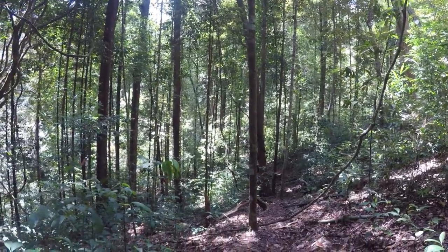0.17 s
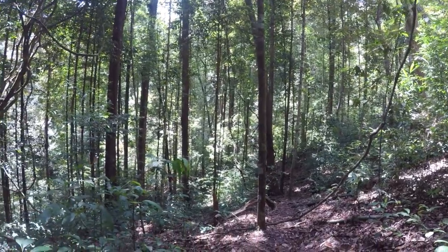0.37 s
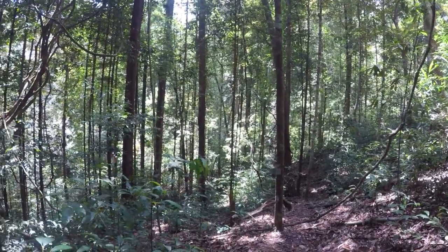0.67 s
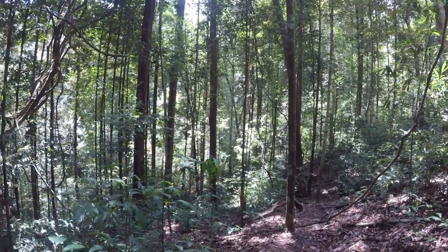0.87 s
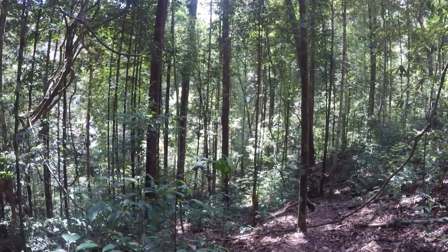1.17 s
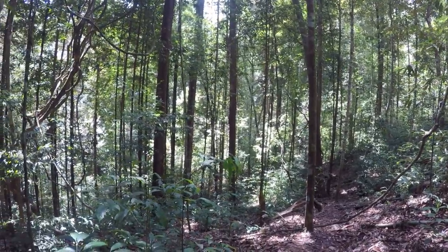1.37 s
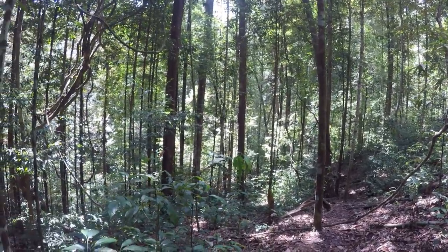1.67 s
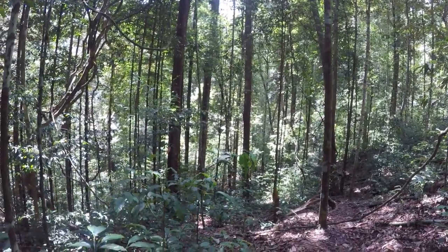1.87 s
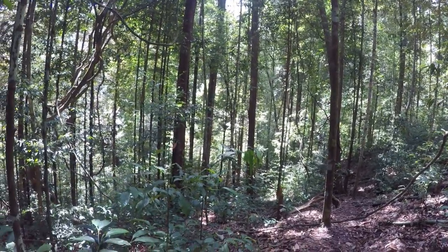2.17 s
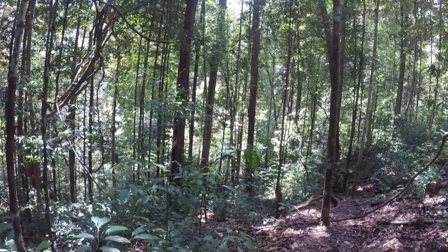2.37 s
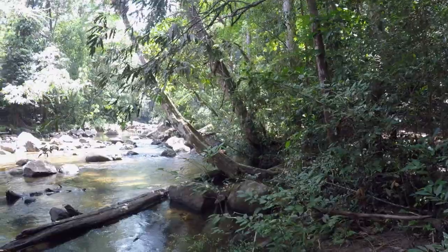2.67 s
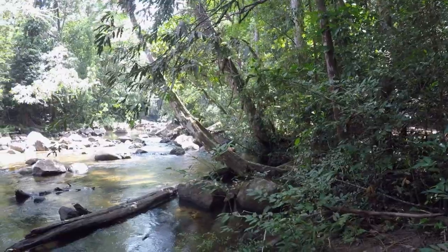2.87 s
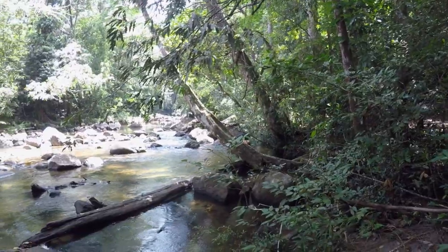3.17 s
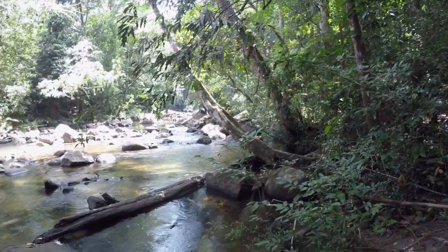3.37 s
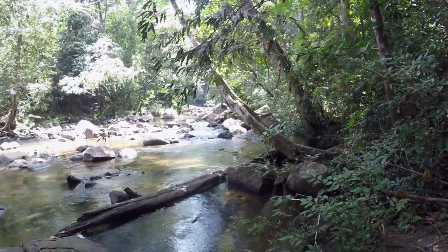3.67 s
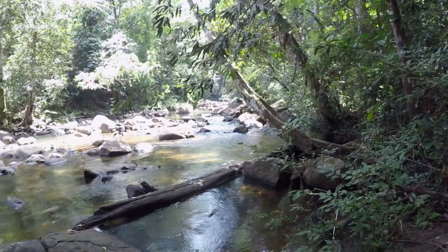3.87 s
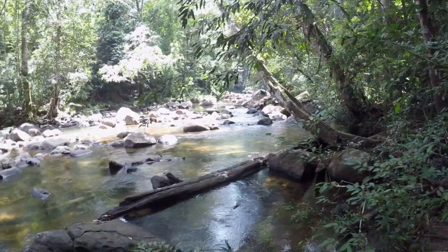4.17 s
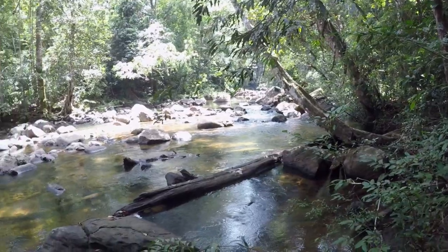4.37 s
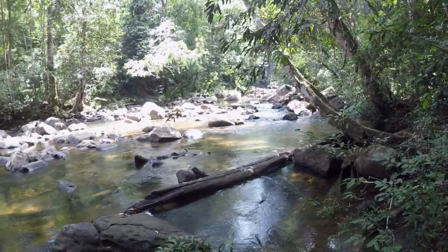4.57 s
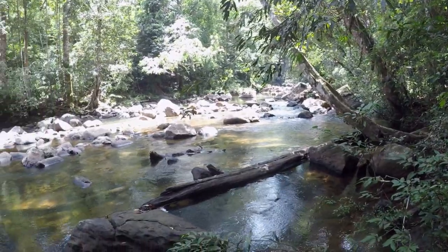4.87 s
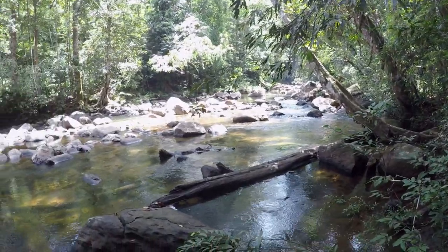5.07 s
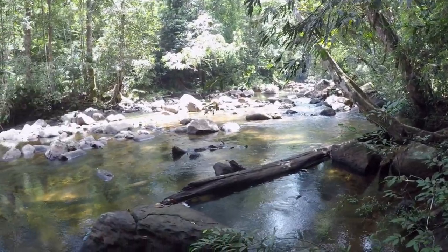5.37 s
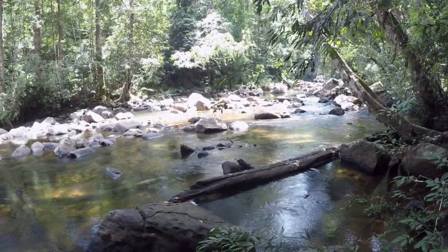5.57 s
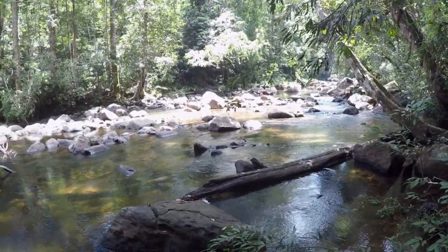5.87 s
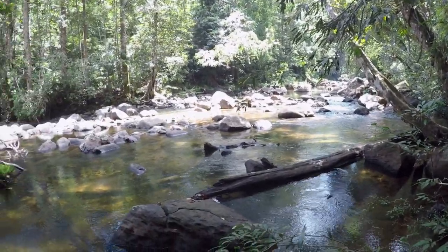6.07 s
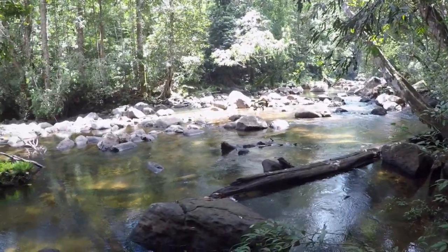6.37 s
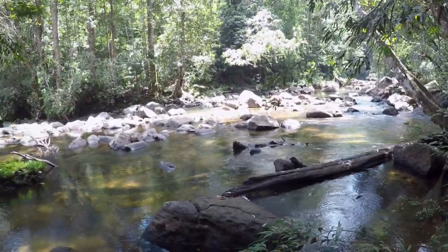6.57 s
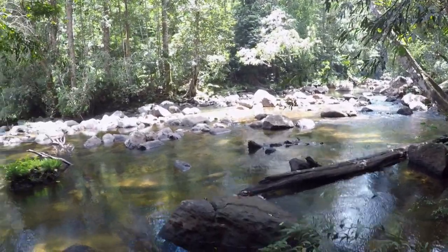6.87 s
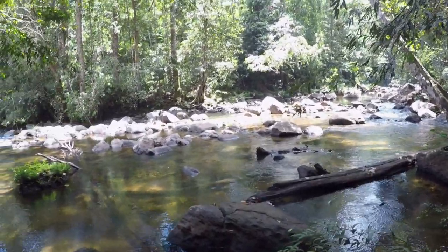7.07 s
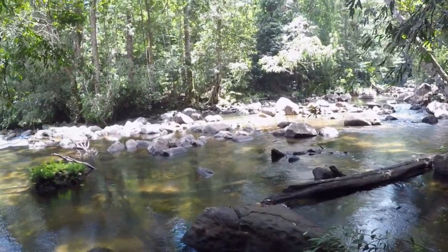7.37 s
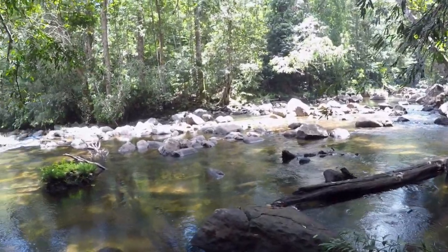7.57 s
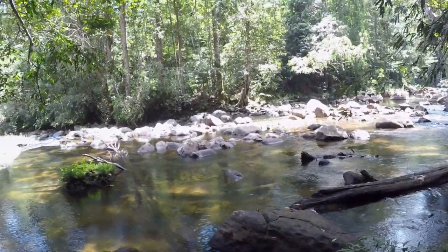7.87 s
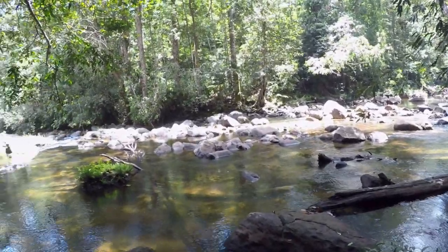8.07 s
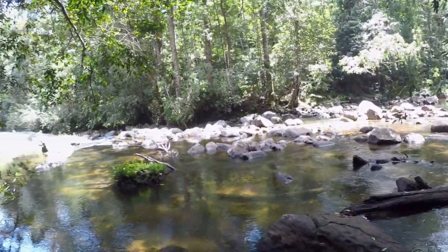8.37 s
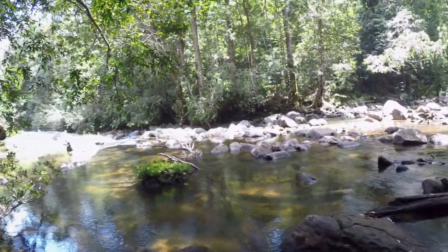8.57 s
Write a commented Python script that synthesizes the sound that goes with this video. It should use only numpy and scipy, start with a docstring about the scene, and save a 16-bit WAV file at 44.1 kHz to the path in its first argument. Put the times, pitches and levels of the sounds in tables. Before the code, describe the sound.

Quiet woodland opens with soft distant water and thin, wavering insect whines. Rubbing, dull thumps, taps and a rubbery squeak come from a hand right on the stereo microphone. Then the place switches suddenly to the stream bank, where water churns and hisses continuously. The sound grows fuller and broader from five seconds, with occasional big bubbles and one sharp, echoing twig crack on the right.

```python
"""A rainforest: a stream far off among the trees under droning insects, then the stream from its bank.
Among the trees a hand rubs and bumps the microphone's casing and a fingertip squeaks across a port.
At the bank the cascade roars, washes and fizzes, bubbles ring, and the image opens from near mono to wide.
A twig snaps on the right. Water is shaped noise and ringing bubbles; insects are fluttering sines;
the hand is noise and slip pulses ringing the casing; the twig is decaying noise bursts."""
import sys
import numpy as np
from scipy.fft import rfft, irfft, next_fast_len
from scipy.io import wavfile
from scipy.ndimage import map_coordinates

SR = 44100
rng = np.random.default_rng(int(sys.argv[2]) if len(sys.argv) > 2 else 0)


def wav_out(sig):
    """Save sig, one row per channel (or a flat mono array), as 16-bit PCM at SR to the path in sys.argv[1]."""
    wavfile.write(sys.argv[1], SR, np.round(np.clip(np.atleast_2d(sig).T, -1, 1) * 32767).astype(np.int16))


N = 384111
T = np.arange(N) / SR
CUT_S = 2.564  # the place changes from trees to bank


def amp(db):
    """Decibels to gain."""
    return 10 ** (np.asarray(db) / 20)


def unit(x):
    """Scale to rms 1."""
    return x / np.sqrt(np.mean(x ** 2) + 1e-20)


def along(points, hz, axis=1):
    """One column of a table, read on a log-frequency axis."""
    cols = np.transpose(points)
    return np.interp(np.log(hz + 1), np.log(cols[0] + 1), cols[axis])


def wobble(rate_hz):
    """A smooth random curve, rate_hz knots a second."""
    knots = rng.standard_normal(int(N * rate_hz / SR) + 4)
    coarse_s = T[::32]
    return np.interp(T, coarse_s, map_coordinates(knots, [coarse_s * rate_hz]))


def filtered(x, response):
    """x times a complex response of frequency."""
    m = next_fast_len(N + SR // 4, True)
    return irfft(rfft(x, m) * response(np.fft.rfftfreq(m, 1 / SR)), m)[..., :N]


def coloured(x, spectrum):
    """x given a spectrum, at rms 1."""
    return unit(filtered(x, lambda hz: amp(along(spectrum, hz))))


def hiss():
    """Two unrelated white noises."""
    return rng.standard_normal((2, N))


def spread(pair, side_db):
    """Mid and side to left and right."""
    mid, side = pair[0], amp(side_db) * pair[1]
    return np.array([mid + side, mid - side])


def fall(start_s, t60_s):
    """An envelope that starts at once and dies away exponentially."""
    return (T >= start_s) * amp(-60 * np.clip((T - start_s) / t60_s, 0, 10))


def swell(start_s, rise_s, hold_s, t60_s):
    """An envelope that rises linearly, holds and dies away exponentially."""
    up = np.clip((T - start_s) / rise_s, 0, 1)
    return up * amp(-60 * np.clip((T - start_s - rise_s - hold_s) / t60_s, 0, 10))


def ringing(modes, t, stretch):
    """Damped modes whose decay times are multiplied by stretch."""
    return sum(amp(db - 60 * t / (t60_s * stretch)) * np.sin(2 * np.pi * hz * t)
               for hz, db, t60_s in modes)


def bubbles(rate_hz, lo_hz, hi_hz, cycles, scatter_db, size):
    """Random bubbles at each port, each a sine rising in pitch as it dies, cut off at size samples."""
    u = np.arange(size) / SR
    ports = []
    for _ in range(2):
        when, pitch, strength = rng.random((int(rate_hz * N / SR), 3)).T[:, :, None]
        turns = lo_hz * (hi_hz / lo_hz) ** pitch * u
        age = turns / cycles
        life = (1 - np.exp(-turns)) * np.exp(-3 * age)
        level = amp(-scatter_db * np.log(np.maximum(strength, .01)))
        ring = level * life * np.sin(2 * np.pi * turns * (1 + 0.09 * np.minimum(age, 1)))
        at = (when * N).astype(int) + np.arange(size)
        ports.append(np.bincount(at.ravel(), ring.ravel(), N)[:N])
    return unit(np.array(ports))


# stereo microphone's image: [hz, likeness_0_to_1, right_lead_rad, left_over_right_db]
PORT_IMAGE = [(97, 0.98, -0.87, 0), (294, 0.95, 0.45, -3.5), (380, 0.67, 0.67, -8.5), (453, 0.89, 2, -4.5),
              (573, 0.81, 3, 0.5), (934, 0.76, 3, -2), (1390, 0.82, 2, -5.5), (1650, 0.34, 1.5, -5.5),
              (2280, 0.8, 1.66, -2.5), (3020, 0.37, 2, -0.5), (3840, 0.3, -1.5, -2), (5770, 0, 7, -6.5),
              (7520, 0.8, -8.5, -1.5), (11000, 0, -7, -1)]


def stereo(pair, spectrum):
    """Correlate two noises per frequency as the ports would; their middle has this spectrum at rms 1."""
    m = next_fast_len(N + SR // 4, True)
    hz = np.fft.rfftfreq(m, 1 / SR)
    a, b = rfft(pair, m)
    alike = np.clip(along(PORT_IMAGE, hz, axis=1), 0, 1)
    shared = alike * np.exp(1j * along(PORT_IMAGE, hz, axis=2))
    lean = amp(along(PORT_IMAGE, hz, axis=3))
    middle = np.sqrt(lean ** 2 + 1 + 2 * lean * shared.real + 1e-3)
    ports = np.array([lean * a, shared * a + np.sqrt(1 - alike ** 2) * b])
    out = irfft(ports * amp(along(spectrum, hz)) / middle, m)[:, :N]
    return out / np.std(out.mean(0))


def turning(pair, table, turn):
    """A stereo sound whose colour passes from the table's first spectrum to its second."""
    before, after = np.array(table)[:, :2], np.array(table)[:, ::2]
    return (1 - turn) * stereo(pair, before) + turn * stereo(pair, after)


# touch at one port: side against middle: [hz, side_over_mid_db]
PORT_SIDE = [(250, 3), (420, -9), (600, 11), (850, 8), (1200, 11), (1700, 8.5), (2400, 4.5), (5000, -5)]


def at_port(x):
    """A sound made right at the microphone, its side a quarter cycle out of step with its middle."""
    return spread([x, filtered(x, lambda hz: 1j * amp(along(PORT_SIDE, hz)))], side_db=0)


# far stream's low roar: [hz, relative_db_per_hz]
FAR_ROAR_SPECTRUM = [(15, -70), (45, -43), (70, -32), (100, -40), (122, -18), (150, 2), (190, -2),
                     (250, -9.5), (330, -16), (450, -27.5), (600, -46), (900, -74)]
# far stream's wash: [hz, relative_db_per_hz]
FAR_WASH_SPECTRUM = [(290, -6), (500, -2), (625, -1.5), (1020, -1.5), (1120, -1.5), (1990, 1.5),
                     (2700, -10.5), (3380, -10.5), (3670, -10), (4220, -14.5), (4790, -15.5), (6320, -12.5),
                     (8130, -14.5), (14000, -23)]
FAR_ROAR_DB, FAR_WASH_DB = -39.5, -52.5


def forest():
    """The stream far off through the trunks: two bands of shaped noise with slightly wavering levels."""
    roar_db = FAR_ROAR_DB + 1.2 * wobble(5.55) + 0.71 * wobble(9.2)
    wash_db = FAR_WASH_DB + 0.3 * wobble(6.7)
    roar = amp(roar_db) * stereo(hiss(), FAR_ROAR_SPECTRUM)
    wash = amp(wash_db) * stereo(hiss(), FAR_WASH_SPECTRUM)
    return roar + wash


# insect drones: [start_s, hold_s, settled_pitch_hz, flutter_hz, level_db]
INSECT_DRONES = [(-.1, 0.47, 3518, 7.7, -64), (.65, 0.56, 3527, 6.4, -61.5), (1.36, .13, 3527, 7, -61.5),
                 (-.1, .75, 3632, 8, -66), (0, .45, 3975, 12, -73), (-.1, .65, 3740, 10, -74),
                 (1.15, .49, 3745, 14, -68.5), (-.1, .24, 3848, 20, -70), (-.1, 1.75, 3700, 200, -71),
                 (-.1, 2.4, 14300, 200, -86)]
INSECT_RISE_S, INSECT_T60_S = .06, .7
SHARP_SHARE, SETTLE_S = .02, 1.7  # shared pitch excess at time 0, and when it has gone


def insects():
    """Each drone is a sine with fast random pitch flutter; one shared sharpness settles from the start."""
    sag = 1 + SHARP_SHARE * np.clip(1 - T / SETTLE_S, 0, 1)
    out = np.zeros((2, N))
    for start_s, hold_s, hz, flutter_hz, db in INSECT_DRONES:
        pitch_hz = hz * sag + flutter_hz * np.array([wobble(500), wobble(500)])
        effort = swell(start_s, INSECT_RISE_S, hold_s, INSECT_T60_S) * amp(db + 1.4 * wobble(59.3))
        out += effort * np.sin(2 * np.pi * np.cumsum(pitch_hz, axis=1) / SR)
    return spread(out, side_db=-3.0)


# soft bumps of the hand: [start_s, relative_level_db, t60_ratio]
HAND_BUMPS = [(1.68, -18, 0.9), (1.805, -23.5, 0.9), (2.196, 5, 0.6), (2.221, -15, 1.36),
              (2.276, -19.5, 2.2), (2.329, -5, 0.8), (2.375, -16, 0.85), (2.405, -11, 0.71),
              (2.419, -9, 0.73)]
# casing's modes: [pitch_hz, relative_level_db, t60_s before t60_ratio]
CASING_MODES = [(188.3, 2, 0.058), (232.4, -3, 0.043), (407, -13, 0.046)]
# grip tightens: [start_s, rise_s, hold_s, t60_s, level_db]
GRIP_BOOMS = [(2.167, 0.03, .025, 0.19, -21.5), (2.263, 0.022, .02, 0.16, -26),
              (2.37, .043, .02, 0.21, -27.5)]
# seam clicks under the hardest bump: [hz, relative_db_per_hz]
SEAM_SPECTRUM = [(500, -7), (1400, -8), (2100, 7), (2700, -9), (3400, -16), (4200, -13), (5000, -24),
                 (9000, -29), (14000, -44)]
# fingertip taps: [start_s, relative_knock_db, tick_db, t60_s]
FINGER_TAPS = [(2.394, -24, -25.5, 0.0041), (2.415, -45, -41, .0043), (2.434, -9, -25.5, 0.0067),
               (2.438, -23, -55, 0.015), (2.471, -18, -52, 0.029), (2.562, -24, -31, 0.0042)]
# tap's knock: [hz, relative_db_per_hz]
KNOCK_SPECTRUM = [(150, -14), (500, 17.5), (1100, 15), (1700, 13), (2300, 11), (2850, -26), (4200, -26),
                  (7000, -48)]
# tap's tick: [hz, relative_db_per_hz]
TICK_SPECTRUM = [(1500, -7), (2900, -6), (3400, 8), (4700, 0), (5800, 6), (9000, -3), (12000, -7),
                 (15000, -20)]
# hollow behind the ports: [pitch_hz, relative_level_db, t60_s before stretch]
HOLLOW_MODES = [(328, -11.5, 0.045), (1060, -10, 0.027), (1410, -19, 0.018), (2180, -15, 0.018)]
PAD_S = .0012  # the soft fingertip builds its knock over this time
LOW_CUT_HZ = 120.0


def knocks():
    """Grip and bumps boom in the casing, its seam clicks; taps knock, tick and ring the hollow."""
    grip = sum(amp(db) * swell(start_s, rise_s, hold_s, t60_s)
               for start_s, rise_s, hold_s, t60_s, db in GRIP_BOOMS)
    boom, hollow = grip * coloured(hiss()[0], ROAR_SPECTRUM), np.zeros(N)
    t = np.arange(SR // 5) / SR
    soft = 1 - np.exp(-(t / 0.0059) ** 2)
    for start_s, db, stretch in HAND_BUMPS:
        boom[round(start_s * SR):][:len(t)] -= amp(db + 3.5) * soft * ringing(CASING_MODES, t, stretch)
    boom = filtered(boom, lambda hz: hz ** 8 / (hz ** 8 + LOW_CUT_HZ ** 8))
    for start_s, db, _, _ in FINGER_TAPS:
        hollow[round(start_s * SR):][:len(t)] += amp(db) * ringing(HOLLOW_MODES, t, stretch=0.8)
    knock_level = sum(amp(db) * swell(start_s - PAD_S, PAD_S, 0, t60_s)
                      for start_s, db, _, t60_s in FINGER_TAPS)
    knock = knock_level * stereo(hiss(), KNOCK_SPECTRUM)
    tick_level = sum(amp(db) * fall(start_s, t60_s) for start_s, _, db, t60_s in FINGER_TAPS)
    tick = tick_level * coloured(hiss(), TICK_SPECTRUM)
    seam = amp(-18) * fall(2.1975, .034) * spread(coloured(hiss(), SEAM_SPECTRUM), side_db=-3)
    return boom + seam + at_port(hollow) + amp(-6.5) * knock + spread(tick, side_db=-4.0)


# hand strokes: [start_s, rise_s, hold_s, t60_s, level_db, firmness_0_to_1, panel_pitch_ratio]
HAND_STROKES = [(1.694, .002, 0.019, 0.16, -35.5, 0.89, 1), (1.701, .014, 0.054, 0.2, -32, 1, 1.03),
                (1.809, .05, .008, 0.074, -29.5, 0.94, 0.99), (1.886, 0.023, 0.049, 0.098, -41, 0.68, .99),
                (1.993, 0.032, 0.14, .26, -43, 0.02, 1), (2.126, .072, 0.044, .7, -39, 0.02, 1)]
# panels rung by rubbing: [pitch_hz, width_hz, relative_level_db]
PANEL_MODES = [(880, 100, 3.5), (1470, 130, 9), (2380, 140, 6), (2700, 120, 4.5), (3320, 110, 6),
               (4250, 80, 7), (4700, 230, 13)]
# firm rubbing: [hz, relative_db_per_hz]
RUB_SPECTRUM = [(350, -15), (580, -8), (780, -1.5), (1200, -1), (2200, 2), (3000, -4), (4000, -10),
                (5500, -13.5), (10000, -15.5), (14000, -41)]
# light brushing: [hz, relative_db_per_hz]
BRUSH_SPECTRUM = [(290, -8), (500, -2), (680, -7), (1000, -0.5), (1750, -3), (2080, -4), (2450, -3.5),
                  (3300, -17), (3950, -8.5), (4550, -21), (5300, -15), (5850, -10.5), (6450, -20),
                  (9000, -24), (14000, -46)]
CATCH_HZ, CATCH_FADE_DB = 480, 7  # nominal catch rate; fade from one catch to the next


def panels(hz):
    """Sum of the panels' resonances as a complex response."""
    return sum(amp(db) * 1j * hz * width_hz / (mode_hz * mode_hz - hz * hz + 1j * hz * width_hz)
               for mode_hz, width_hz, db in PANEL_MODES)


def slides():
    """Skin drags in tiny uneven catches; firm strokes ring panels at a wandering pitch, light ones brush."""
    firm, light, bend = np.zeros((3, N))  # powers
    for start_s, rise_s, hold_s, t60_s, db, firmness, ratio in HAND_STROKES:
        power = (amp(db) * swell(start_s, rise_s, hold_s, t60_s)) ** 2
        share = np.clip(firmness, 0, 1)
        firm += share * power
        light += (1 - share) * power
        bend += share * power * (ratio - 1)
    pitch_ratio = 1 + bend / (firm + 1e-12) + 0.0118 * wobble(30)
    since_slip = np.cumsum(CATCH_HZ * amp(2.2 * wobble(300))) / SR % 1
    catches = hiss() * amp(2.2 * hiss() - CATCH_FADE_DB * since_slip)
    # reading the ringing faster or slower bends its pitch
    read_at = np.cumsum(pitch_ratio)
    ring = np.array([np.interp(read_at, np.arange(N), port) for port in filtered(catches, panels)])
    rub_level = np.sqrt(firm) * amp(0.53 * wobble(150))
    rub = rub_level * stereo(catches + amp(1.5) * ring, RUB_SPECTRUM)
    brush_level = np.sqrt(light) * amp(0.89 * wobble(160) + 0.65 * wobble(35.2))
    brush = brush_level * stereo(hiss() * amp(2.1 * hiss()), BRUSH_SPECTRUM)
    return rub + brush


# air pushed by the hand or stirring at the ports: [start_s, rise_s, hold_s, t60_s, level_db]
AIR_PUFFS = [(2.317, 0.011, 0.036, 0.58, -30.5), (2.462, 0.025, 0.014, 0.11, -24),
             (2.529, 0.0096, 0.018, .015, -20.5), (2.58, 0.036, 0.66, 5.6, -57.5), (6.074, .3, .12, 2, -54),
             (6.9, 0.46, 0.62, 5, -63)]
# air at the ports: [hz, relative_db_per_hz]
RUMBLE_SPECTRUM = [(12, -45), (26, -5), (42, -15), (65, -1.5), (85, -23), (130, -12), (300, -29),
                   (700, -28), (3000, -110)]


def draught():
    """Each puff of air rumbles in the ports: low noise under a swell."""
    flow = sum(amp(db) * swell(start_s, rise_s, hold_s, t60_s)
               for start_s, rise_s, hold_s, t60_s, db in AIR_PUFFS)
    return flow * spread(coloured(hiss(), RUMBLE_SPECTRUM), side_db=-27)


# fingertip's drag: [time_s, nominal_slip_rate_hz, level_db]
FINGER_DRAG = [(2.438, 520.3, -60), (2.447, 520, -41), (2.459, 546, -33.5), (2.469, 520, -46),
               (2.478, 540, -30), (2.487, 589.4, -32), (2.501, 570.4, -45), (2.515, 620, -33),
               (2.523, 660, -31), (2.53, 540, -29), (2.535, 480, -18), (2.545, 419, -23.5),
               (2.562, 346, -22.5)]
# fingertip's squeak: [hz, relative_db_per_hz]
SQUEAK_SPECTRUM = [(200, 3.5), (400, 10), (600, 6), (760, -1.5), (1050, 0.5), (1250, -0.5), (1700, -6.5),
                   (2300, -9.5), (2800, -26), (3350, -19.5), (4200, -32), (8000, -43)]
SLIP_NOISE, SLIP_JITTER = .5, .035  # noise against slips at rms 1; unsteadiness of the rate (share)
SMEAR_S_PER_HZ = 6e-7  # soft skin delays each slip's higher frequencies


def finger():
    """A fingertip sticks and slips across a port: a squeak that breaks off twice, then falls when pressed."""
    time_s, slip_hz, db = np.transpose(FINGER_DRAG)
    rate_hz = np.interp(T, time_s, slip_hz) * (1 + SLIP_JITTER * wobble(200))
    slips = unit(np.diff(np.floor(np.cumsum(rate_hz) / SR), prepend=0))
    slips = filtered(slips - slips.mean(), lambda hz: np.exp(-1j * np.pi * SMEAR_S_PER_HZ * hz ** 2))
    rough = amp(1.6 * wobble(400)) * (slips + SLIP_NOISE * rng.standard_normal(N))
    level = (T > time_s[0]) * amp(np.interp(T, time_s, db))
    return at_port(level * coloured(rough, SQUEAK_SPECTRUM))


# cascade's deep boom, also the grip's: [hz, relative_db_per_hz]
ROAR_SPECTRUM = [(20, -53), (60, -39), (98, -28.5), (120, -24), (140, -1.5), (165, 3), (200, -2.5),
                 (240, -9), (320, -40), (400, -24), (600, -61), (1500, -120)]
# churn above the boom: [hz, relative_db_per_hz]
CHURN_SPECTRUM = [(60, -80), (150, -35), (200, -3), (240, 0.5), (295, -4), (345, -8), (420, -16.5),
                  (520, -24.5), (800, -84), (2000, -120)]
# rapids' wash: [hz, before_turn_relative_db_per_hz, after_turn_relative_db_per_hz]
WASH_SPECTRA = [(300, -26, -24), (484, -8.5, -8.5), (660, -3.5, -5.5), (1020, -8.5, -7), (1120, -7, -6),
                (1370, -4, -4.5), (1600, -1.7, -2), (1870, 0, 0), (2270, -4.5, -2), (2610, -7, -5.5),
                (2870, -7, -11), (3200, -10, -10.5), (3690, -10.5, -11), (4470, -21, -22), (6500, -59, -59)]
# rapids' fizz: [hz, before_turn_relative_db_per_hz, after_turn_relative_db_per_hz]
FIZZ_SPECTRA = [(3000, -30, -30), (4400, -9, -3), (4810, 1.5, -1), (5050, -2.5, -2.5), (5370, 2.5, 0),
                (6100, -2.5, 0.5), (6880, -0.5, -3), (8000, -9, -8.5), (10000, -16, -12.5),
                (14000, -47, -47)]
# fine spray: [hz, relative_db_per_hz]
SPRAY_SPECTRUM = [(5000, -18), (7500, 0), (8800, 2), (10200, 0), (11500, -8), (13500, -12.5), (15200, -33)]
TURN_AT_S, TURN_S = 5.02, 2.01  # turn along the bank toward the open water
# level before the turn, gain over the turn
ROAR_DB, ROAR_GAIN_DB = -37, 10
CHURN_DB, CHURN_GAIN_DB = -36, 5.5
WASH_DB, WASH_GAIN_DB = -41, 1.5
FIZZ_DB, FIZZ_GAIN_DB = -56, 5.5
SPRAY_DB, SPRAY_GAIN_DB = -59, -1.6
DEEPEN_S, DEEPEN_ROAR_DB, DEEPEN_CHURN_DB = 0.44, 3.5, -4.5  # a quick extra shift in the low end from 5.02 s: its time, boom gain, churn gain
FIZZ_DULL_DB, SPRAY_DULL_DB, OPEN_S = 10, 25, 0.2  # first treble loss at the bank; its time constant


def cascade():
    """Plunging water booms and churns; rapids wash, babble, fizz and spray; from 5.02 s the boom quickly swells
    and the churn dips."""
    turn = np.clip((T - TURN_AT_S) / TURN_S, 0, 1)
    deep = np.clip((T - TURN_AT_S) / DEEPEN_S, 0, 1)
    dull = np.exp(-np.maximum(T - CUT_S, 0) / OPEN_S)
    roar_db = ROAR_DB + ROAR_GAIN_DB * turn + DEEPEN_ROAR_DB * deep + 0.59 * wobble(12)
    churn_db = CHURN_DB + CHURN_GAIN_DB * turn + DEEPEN_CHURN_DB * deep + 1.3 * wobble(13)
    wash_db = WASH_DB + WASH_GAIN_DB * turn + 0.57 * wobble(14)
    fizz_db = FIZZ_DB + FIZZ_GAIN_DB * turn - FIZZ_DULL_DB * dull + 0.4 * wobble(26)
    spray_db = SPRAY_DB + SPRAY_GAIN_DB * turn - SPRAY_DULL_DB * dull + 0.23 * wobble(13)
    roar = amp(roar_db) * stereo(hiss(), ROAR_SPECTRUM)
    churn = amp(churn_db) * stereo(hiss(), CHURN_SPECTRUM)
    babble = bubbles(rate_hz=550, lo_hz=887, hi_hz=3660, cycles=12, scatter_db=1.5, size=448)
    wash = amp(wash_db) * turning(hiss() + amp(-11.0) * babble, WASH_SPECTRA, turn)
    fizz = amp(fizz_db) * turning(hiss(), FIZZ_SPECTRA, turn)
    spray = amp(spray_db) * stereo(hiss(), SPRAY_SPECTRUM)
    return roar + churn + wash + fizz + spray


# faint glugs between the rocks: [hz, relative_colour_db]
GLUG_COLOUR = [(150, -20), (300, 0.5), (420, -6.5), (700, -14), (1200, -35)]
# big bubbles: [start_s, first_pitch_hz, last_pitch_hz, length_s, level_db]
BIG_BUBBLES = [(4.055, 840, 950, 0.051, -39), (4.1, 730, 770, 0.029, -40), (4.115, 875, 900, 0.015, -35),
               (6.18, 420, 382, 0.063, -39.5), (6.42, 496, 530, .05, -43), (8.04, 405, 336, .11, -30),
               (8.215, 405, 312, 0.092, -32)]
GLUG_DB = -50.5


def gurgles():
    """Big air pockets ring between the rocks, gliding in pitch, over a scatter of fainter glugs."""
    glugs = bubbles(rate_hz=22, lo_hz=280, hi_hz=640, cycles=26, scatter_db=2, size=4096)
    out = amp(GLUG_DB) * stereo(glugs, GLUG_COLOUR)
    for start_s, first_hz, last_hz, length_s, db in BIG_BUBBLES:
        age = np.clip((T - start_s) / length_s, 0, 1)
        turns = length_s * age * (first_hz + (last_hz - first_hz) * age / 2)
        out += amp(db) * np.sin(np.pi * age) * np.sin(2 * np.pi * turns)
    return out


# fibres break one after another: [start_s, level_db]
FIBRE_CRACKS = [(6.8179, -21), (6.8216, -28), (6.8256, -28), (6.8308, -29)]
# fibres' bright crack: [hz, relative_db_per_hz]
CRACK_SPECTRUM = [(2000, -30), (3600, -14), (4400, 1), (5400, -1), (6300, 3), (8000, -5), (10000, -9),
                  (11500, -25), (15000, -33)]
# wood's knock: [hz, relative_db_per_hz]
WOOD_SPECTRUM = [(400, -28), (800, -2), (1200, -1), (1550, 2), (2100, 0), (2600, -16), (4000, -35)]
# echo of crack and knock: [hz, relative_db_per_hz]
ECHO_SPECTRUM = [(400, -34), (800, 1), (1550, 4), (2100, 0), (2600, -11), (3600, -15), (4400, -6),
                 (6300, -2), (9500, -7), (12000, -24), (15000, -32)]
CRACK_T60_S = 0.011
FOLIAGE_HZ = 10000  # leaves swallow the far echo above this


def twig():
    """Fibres crack and wood knocks on the right; near trunks, then the duller forest, scatter the snap."""
    crack_level = sum(amp(db) * fall(start_s, CRACK_T60_S) for start_s, db in FIBRE_CRACKS)
    crack = crack_level * coloured(hiss(), CRACK_SPECTRUM)
    wood = amp(-20) * fall(6.8188, 0.031) * coloured(hiss(), WOOD_SPECTRUM)
    near = amp(-28.5) * fall(6.8215, 0.16) * coloured(hiss(), ECHO_SPECTRUM)
    far = amp(-36.0) * fall(6.835, 0.51) * coloured(hiss(), ECHO_SPECTRUM)
    far = filtered(far, lambda hz: 1 / (1 + (hz / FOLIAGE_HZ) ** 4))
    return (crack + wood + near) * amp([[-4], [3.5]]) + far * amp([[-2], [2]])


HISS_WIDTH_HZ, HISS_WIDTH_DB = 4500, -20  # faint stereo width in the hiss above this pitch
WIDEN_AT_S, WIDEN_S = 4.867, 0.74  # start, time constant


def scene():
    """The trees and the hand, then the bank, which is nearly mono before the image widens."""
    trees = forest() + insects() + knocks() + slides() + finger()
    trees = trees * np.clip((CUT_S - T) / 0.0018, 0, 1)
    left, right = cascade() + gurgles() + twig()
    mid, side = (left + right) / 2, (left - right) / 2
    width = 1 - np.exp(-np.maximum(T - WIDEN_AT_S, 0) / WIDEN_S)
    hiss_side = amp(HISS_WIDTH_DB) * filtered(side, lambda hz: hz > HISS_WIDTH_HZ)
    bank = spread([mid, width * side + (1 - width) * hiss_side], side_db=-0.8)
    return trees + bank * np.clip((T - CUT_S) / 0.024, 0, 1) + draught()


CEILING, TOP_HZ = .8, 15200  # ceiling in full-scale units


def record(dry):
    """Peaks round off smoothly toward a ceiling, then nothing passes above the band limit."""
    rounded = dry / (1 + np.abs(dry / CEILING) ** 4) ** .25
    return filtered(rounded, lambda hz: hz < TOP_HZ)


dry = scene()
out = record(dry)
wav_out(out)
```